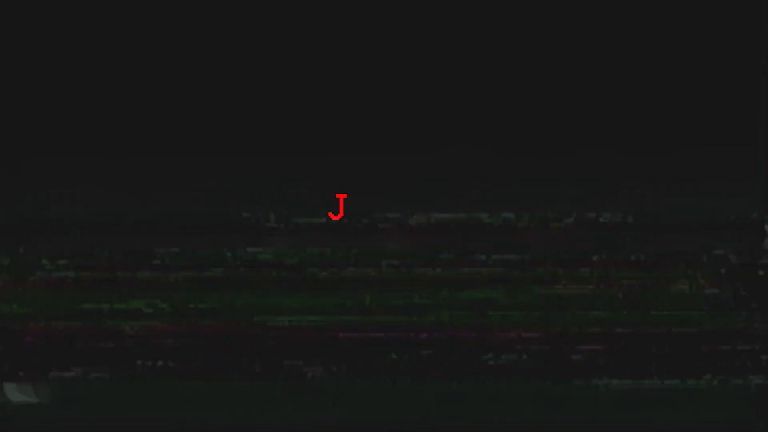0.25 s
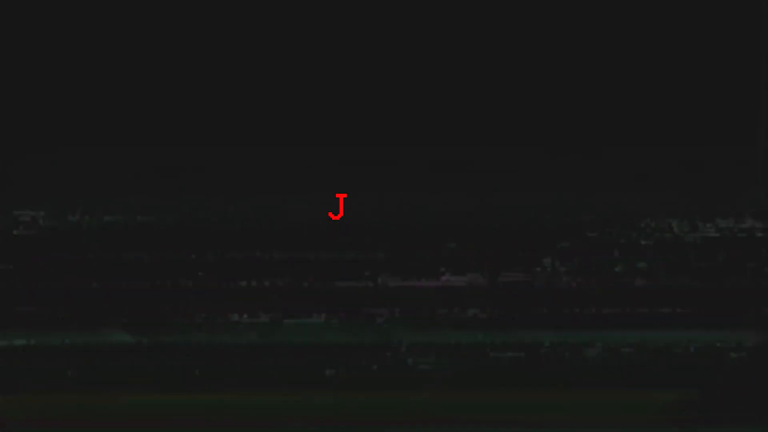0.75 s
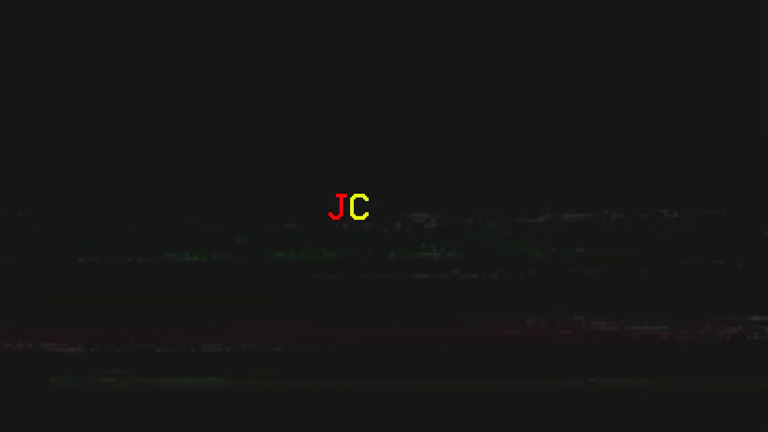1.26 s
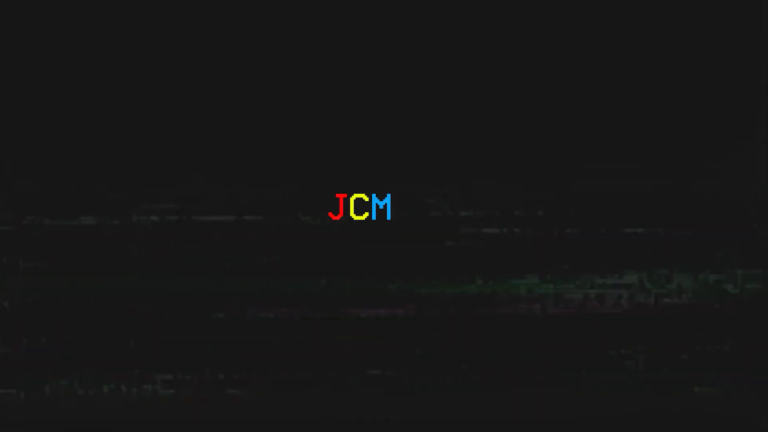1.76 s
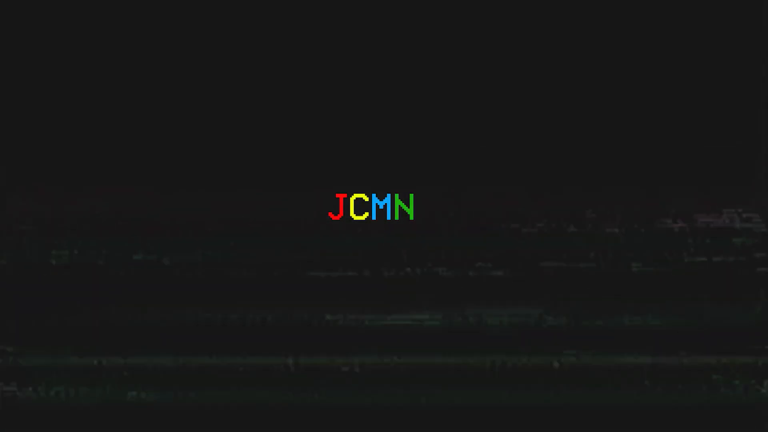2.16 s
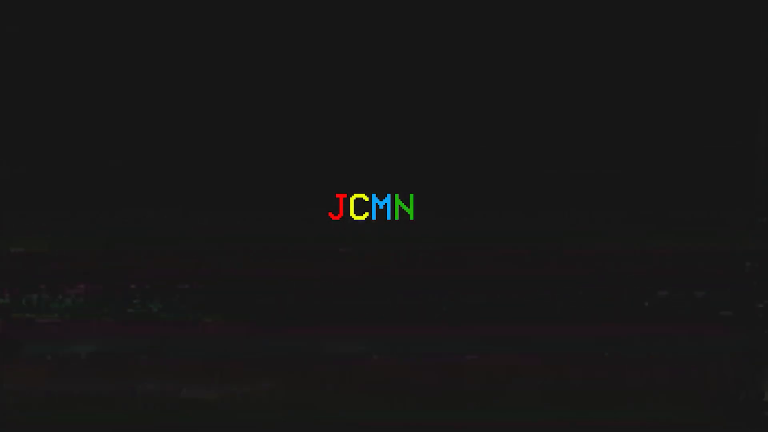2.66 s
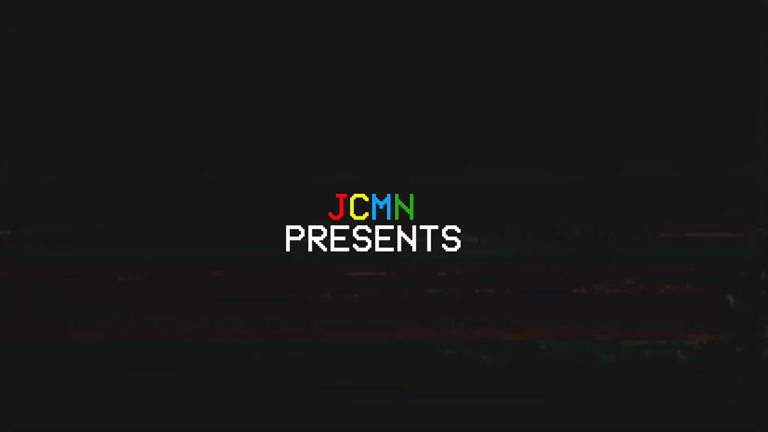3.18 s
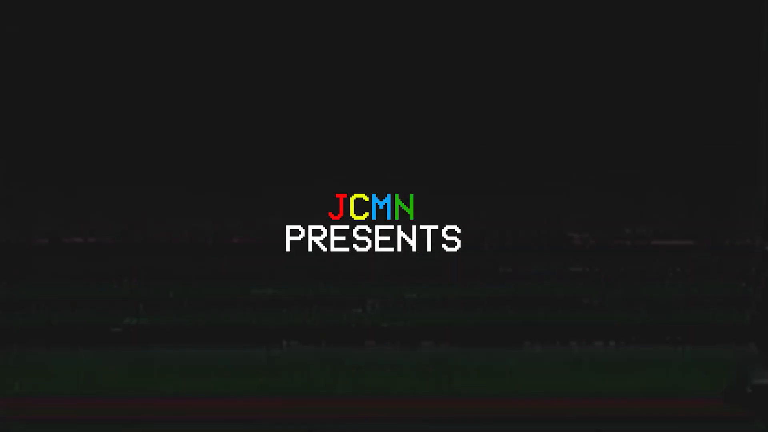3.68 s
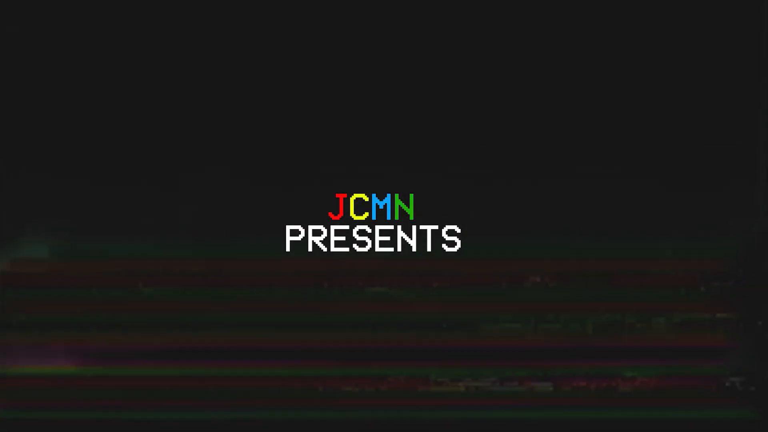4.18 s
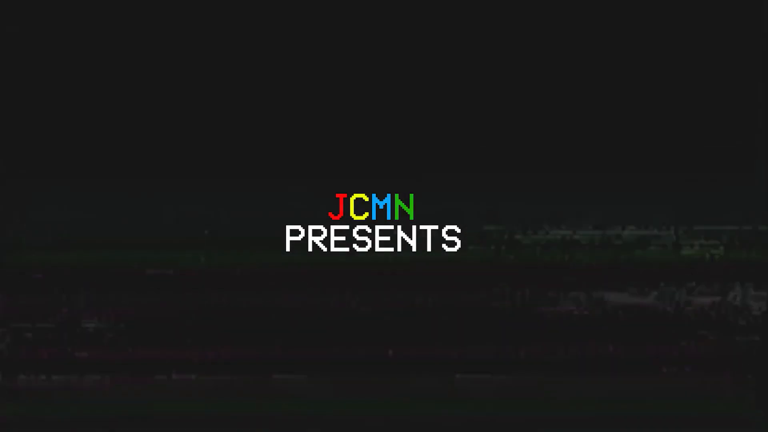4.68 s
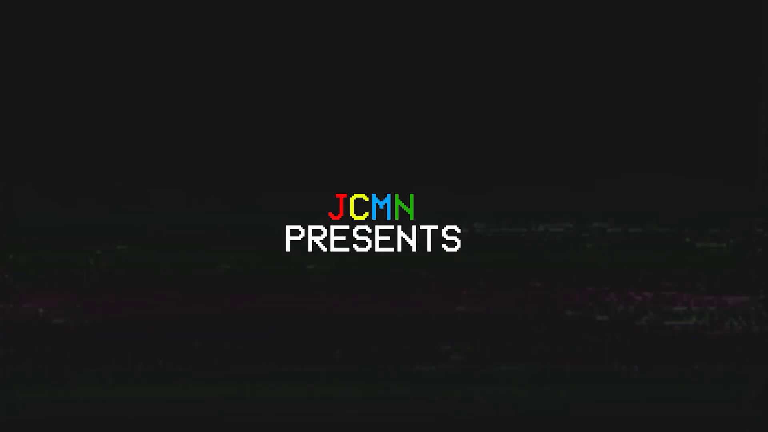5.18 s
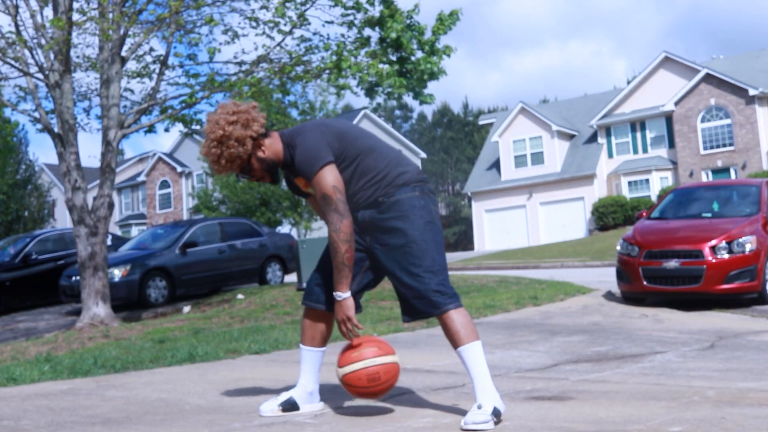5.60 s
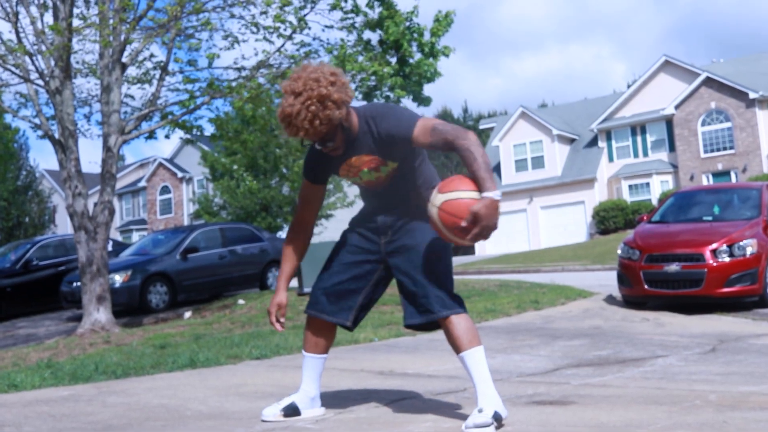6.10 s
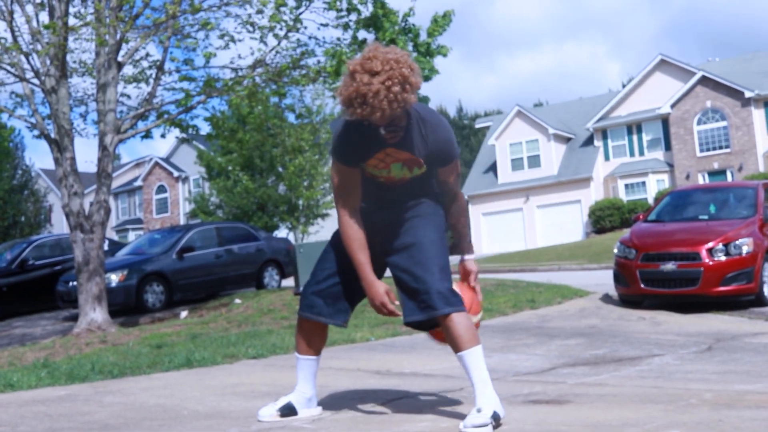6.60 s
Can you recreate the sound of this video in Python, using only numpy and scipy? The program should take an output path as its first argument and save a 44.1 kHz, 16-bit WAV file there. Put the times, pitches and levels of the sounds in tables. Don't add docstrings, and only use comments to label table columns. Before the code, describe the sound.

Dribbling on a suburban driveway: nine irregular bounces, some hard and bright, some softer and duller, answered by a near wall and short, dull echoes from house fronts. Fingertip ticks, palm pats and pebbled-cover brushing fall between them. Underneath lie steady distant traffic, leaf hiss and light wind rumble, with faint insect buzzes and small metal chimes. The microphone is a few metres away.

```python
import sys
import numpy as np
from scipy import signal
from scipy.fft import rfft, irfft
from scipy.io import wavfile
from scipy.ndimage import uniform_filter1d

SR = 44100
rng = np.random.default_rng(int(sys.argv[2]) if len(sys.argv) > 2 else 0)


def gain_from_decibels(decibels):
    exponent = np.asarray(decibels, float) / 20
    return 10 ** exponent


def wav_record(signal):
    frames = np.transpose(np.atleast_2d(signal))
    bounded = np.clip(frames, -1, 1)
    quanta = np.round(bounded * 32767).astype(np.int16)
    wavfile.write(sys.argv[1], SR, quanta)


N = 302085
TIME = np.arange(N) / SR

# pitch_hz, level_db (per Hz)
SUBURB_COLOUR = [(35, -31), (60, -5), (156, -1), (183, -4), (300, -10), (570, -16.5), (900, -14),
                 (1800, -19.5), (4000, -25), (10000, -30.5), (13500, -30.5), (15750, -26.5), (15950, -77)]
# middle_s, level_db, lasts_s
PASSING_CARS = [
    (0.297, 3, .12),
    (4.5, 3.5, 0.16),
]
# pitch_hz, level_db
WIND_COLOUR = [(12, -8), (25, 0), (40, -1.5), (70, -6), (140, -28), (500, -66)]
# pitch_hz, level_db
RUMBLE_COLOUR = [(30, -14), (70, 1), (140, 0.5), (250, -8.5), (500, -31), (2000, -68)]
# time_s, level_db
GUSTS = [(0.07, -66), (0.12, -65), (0.26, -66), (0.48, -62), (0.75, -66), (1.26, -64.5), (1.54, -60),
         (1.94, -63), (2.51, -58.5), (2.68, -53.5), (3.43, -55.5), (3.58, -54.5), (4.34, -58.5),
         (4.96, -58.5), (5.09, -48.5), (5.64, -60.5), (5.88, -63), (6.85, -63)]
# middle_s, level_db, lasts_s
FOOT_SHIFTS = [(1.853, 6, 0.11), (2.552, -1.5, 0.13), (3.935, 5.5, 0.052), (4.36, 5.5, .06),
               (5.218, 5.5, 0.065), (5.9, 5.5, .12), (6.3, 2, 0.3)]
# middle_s, level_db, lasts_s
INSECT_BUZZES = [
    (2.73, -73, .07),
    (6.8, -69, .13),
]
# middle_s, level_db, lasts_s, top_db (against the 8 kHz hiss)
BRUSHES = [(.325, -69, 0.014, 1), (0.588, -64.5, 0.023, 2), (0.644, -76, .02, 4), (1.756, -60, 0.016, 1),
           (3.014, -63.5, 0.028, 1), (3.833, -67, 0.0099, 3), (4.357, -64, 0.054, 2),
           (4.795, -66, 0.04, -2), (5.816, -63, 0.07, 0), (6.082, -65, 0.021, -8)]
# start_s, treble_db, body_db
FINGER_TICKS = [(0.496, -56, -49), (1.732, -51, -55), (1.739, -45.5, -47), (1.748, -59, -48),
                (1.7634, -62, -49.5), (2.822, -51, -56), (2.794, -71, -65), (2.858, -60, -62),
                (2.97, -54, -60), (2.974, -47, -49.5), (2.98, -52, -48), (2.987, -58, -53),
                (3.827, -52, -52.5), (3.831, -59, -57), (4.274, -60, -58), (4.88, -60, -66),
                (5.666, -56, -41), (6.07, -64, -63)]
# start_s, level_db, pitch_hz, build_ms
PALM_PATS = [(1.735, -39, 190, 5.3), (1.738, -41.5, 430, 4.7), (1.747, -47, 263, 4.3),
             (1.763, -44, 270, 2.6), (2.973, -40, 212, 5.5), (2.976, -40, 404, 4.6),
             (3.8262, -41, 394, 2.5), (3.827, -55, 260, 6), (5.664, -43, 380, 3.8)]
# start_s, thump_db, thump_hz, thump_late_ms, hardness_db
BOUNCES = [
    (0.4159, -19.5, 252, -0.53, 2),
    (1.5871, -14, 242, -1.82, 2),
    (2.7977, -14.5, 243, -0.58, 1.5),
    (3.6806, -10.5, 239, 0.83, -0.8),
    (4.0823, -14, 228, -0.39, -2),
    (4.6414, -22.5, 240, -1, -4.5),
    (4.969, -10.5, 226, 1.5, -3.5),
    (5.6787, -9.5, 235, -0.41, 0.4),
    (6.8093, -19.5, 201, -0.44, 1.5),
]
# lower_hz, lower_db, upper_hz, upper_db, first_spike_db
AIR_MODES = [(478, -19.5, 1240, -17, -14.5), (1200, -20.5, 1406, -19, -9.5), (865, -16.5, 1107, -17, -42),
             (918, -17, 1096, -18.5, -38), (820, -26.5, 1330, -27, -14.5), (1130, -45, 1300, -44, -21),
             (720, -14.5, 1150, -20.5, -54), (605, -29, 1180, -16, -42), (1150, -18, 1690, -14.5, -35)]
# pitch_hz, level_db
CRACK_COLOUR = [(1500, 5.5), (2600, 0), (3300, -10), (5500, -5.5), (7000, -9.5), (8400, -5.5),
                (11000, -13.5), (14000, -10), (17000, -55)]
# pitch_hz, level_db, t60_s
BALL_RING = [(410, -1.5, 0.073), (435.7, 4, 0.058), (546, -7, 0.06), (954, -14, 0.071), (1060, -5.5, 0.045),
             (1240, -13, 0.039), (1817, -6, 0.033)]
# delay_s, level_db
HOUSE_FRONTS = [(0.024, -25), (0.043, -35), (.051, -27), (.071, -32.5), (.096, -38)]
# pitch_hz, level_db
STREET_COLOUR = [(100, -4), (400, 1.5), (1300, -5.5), (2600, -1.5), (4500, -1), (10000, -3.5)]
# start_s, pitch_hz, level_db, t60_s
FAR_ROD = [(3.719, 2805, -67, 0.76)]
# pitch_hz, level_db, t60_s
ROD_MODES = [(1905, 0.5, 1), (5044, 0.5, 0.26), (7100, -13, .06), (9250, -3, .06)]
# start_s, level_db, brightness_db, full_s (then the ring sinks to about half)
CHIME_HITS = [
    (5.092, -62, 5, 0.099),
    (5.198, -63, -0.5, 0.11),
    (5.31, -62.5, -6, 0.14),
]


def level(x, db):
    return x * gain_from_decibels(db) / np.sqrt(np.mean(x ** 2))


def band(x, hz, width):
    return signal.lfilter(*signal.iirpeak(hz, hz / width, fs=SR), x)


def colour(x, points):
    hz, db = np.transpose(points)
    f = np.log(np.fft.rfftfreq(len(x), 1 / SR) + 1)
    return irfft(rfft(x) * gain_from_decibels(np.interp(f, np.log(hz), db)), len(x))


def walk(rate):
    k = int(SR / rate)
    held = np.repeat(rng.standard_normal(N // k + 1), k)
    return 0.98 * uniform_filter1d(uniform_filter1d(held, k), k)[:N]


def hump(s, lasts):
    return np.exp(-((TIME - s) / lasts) ** 2)


def humps(events):
    return sum(db * hump(s, lasts) for s, db, lasts in events)


def add(out, s, sound):
    i = int(s * SR)
    out[i:i + len(sound)] += sound[:len(out) - i]


def swell(t, ms):
    u = np.maximum(t, 0) / (ms / 1000)
    return u * np.exp(1 - u)


def ring(t, hz, t60):
    return np.sin(2 * np.pi * hz * t) * np.exp(-np.log(1000) * t / t60)


def suburb():
    hum = colour(rng.standard_normal(N), SUBURB_COLOUR)
    octaves = sum(band(hum, hz, hz) * gain_from_decibels(walk(3.28)) for hz in 62 * 2. ** np.arange(8))
    bed = level(octaves + 0.73 * hum, -58)
    leaves = signal.lfilter(*signal.butter(1, 1500, "high", fs=SR), bed)
    bed = bed + band(bed, 1500, 1300) * (gain_from_decibels(humps(PASSING_CARS)) - 1)
    leaves_db = 1.25 + 0.25 * (TIME - N / SR / 2) - 2.5 * hump(2.9, 0.91)
    return bed + leaves * (gain_from_decibels(leaves_db) - 1)


def air():
    wind_db = np.interp(TIME, *np.transpose(GUSTS))
    rumble_db = -58 + 0.48 * (wind_db + 57.5) + humps(FOOT_SHIFTS)
    wind = level(colour(rng.standard_normal(N), WIND_COLOUR), 0.47) * gain_from_decibels(wind_db + 3.2 * walk(17))
    rumble = level(colour(rng.standard_normal(N), RUMBLE_COLOUR), -2.3)
    rumble = rumble * gain_from_decibels(rumble_db + 1.5 * walk(14) + 0.5 * walk(2.94))
    insect = level(band(band(rng.standard_normal(N), 5900, 950), 5900, 950), 0)
    return wind + rumble + insect * sum(gain_from_decibels(db) * hump(s, lasts) for s, db, lasts in INSECT_BUZZES)


def brushes():
    hiss = level(band(band(rng.standard_normal(N), 6800, 3000), 8500, 2200), -4) * gain_from_decibels(1.4 * walk(200))
    top_colour = [(6000, -9), (10500, -7), (13200, 3.0), (15700, -7), (16000, -40)]
    top = level(colour(rng.standard_normal(N), top_colour), -2)
    return sum(gain_from_decibels(db) * hump(s, lasts) * (hiss + gain_from_decibels(top_db) * top) for s, db, lasts, top_db in BRUSHES)


def palms():
    out, t = brushes(), TIME[:SR // 10]
    tick_colour = [(3500, -26), (6000, -3), (8400, 3.5), (11000, -7), (13500, 0), (15800, -11), (16400, -30)]
    for s, treble_db, body_db in FINGER_TICKS:
        treble = colour(rng.standard_normal(len(t)), tick_colour)
        body = band(band(rng.standard_normal(len(t)), 650, 1700), 876, 2200)
        add(out, s, level(treble, treble_db) * swell(t, 0.67) + level(body, body_db) * swell(t, 1.0))
    for s, db, hz, ms in PALM_PATS:
        add(out, s, gain_from_decibels(db) * swell(t, ms) * np.exp(-(t / 0.013) ** 2) * np.sin(2 * np.pi * hz * t))
    return out


def grit(t, db):
    return level(colour(rng.standard_normal(len(t)), CRACK_COLOUR), db)


def slap(t, late_ms, modes):
    slap_ms, knee_hz = 3.22, 1470
    sound = sum(gain_from_decibels(db) * np.sin(2 * np.pi * hz * t)
                * np.exp(-(t * 1000 / slap_ms * max(hz / knee_hz, 1)) ** 2) for hz, db in modes)
    return sound * np.minimum(t * 1000 / (0.032 + 0.92 * max(late_ms, 0)), 1)


def contact(t, thump_db, thump_hz, late_ms, hard_db, modes, spike_db):
    late = t - late_ms / 1000
    thump = gain_from_decibels(thump_db) * swell(late, 2.85) * np.sin(2 * np.pi * thump_hz * late)
    squash = gain_from_decibels(-23.5 + 1.3 * hard_db) * swell(late, 2.64) * np.sin(2 * np.pi * 122 * late)
    onset = np.sin(np.pi / 2 * np.minimum(t / 0.00027, 1)) ** 2
    sound = (thump - squash + slap(t, late_ms, modes)) * onset
    spike = signal.lfilter(*signal.butter(2, 2780, fs=SR), swell(t, 0.12))
    sound = sound + gain_from_decibels(spike_db) * spike
    crack = grit(t, -27 + hard_db) * (np.exp(-t / 0.0011) + 0.57 * np.exp(-(t / 0.0041) ** 2))
    return sound - band(sound, 3490, 1960) + crack


def lift(t, flat_ms, click_db, peel_db):
    since = t - flat_ms / 1000
    peel = grit(t, peel_db) * np.exp(-(since / np.where(since < 0, .0028, .0012)) ** 2)
    click = gain_from_decibels(click_db) * swell(since + 0.00039, 0.27) ** 2 * np.cos(2 * np.pi * 450 * since)
    return peel - click


def free_ring(t, flat_ms, db):
    drift = rng.standard_normal((len(BALL_RING), 2))
    free = sum(gain_from_decibels(mode_db + 2.55 * d[0]) * ring(t, hz * (1 + 0.028 * d[1]), t60)
               for (hz, mode_db, t60), d in zip(BALL_RING, drift))
    return gain_from_decibels(db) * free * np.clip(t * 1000 / flat_ms, 0, 1) ** 2


def ball():
    out, t = np.zeros(N), TIME[:SR // 4]
    for bounce, air_modes in zip(BOUNCES, AIR_MODES):
        s, thump_db, thump_hz, late_ms, hard_db = bounce
        low_hz, low_db, high_hz, high_db, spike_db = air_modes
        third_db = max(low_db, high_db) - 13.5 + 5.5 * abs(late_ms) + 0.17 * (spike_db + 20)
        modes = [(low_hz, low_db), (high_hz, high_db), (1940, third_db), (2700, third_db - 3)]
        sound = contact(t, thump_db, thump_hz, late_ms, hard_db, modes, spike_db)

        wall_db = -28.5 + 0.81 * (spike_db + 25) - 0.9 * (thump_db + 16)
        wall = gain_from_decibels(wall_db) * signal.lfilter(*signal.butter(1, 600, fs=SR), sound)
        add(out, s + 0.0086, wall)

        flat_ms = 10.8 + 0.35 * late_ms
        free = free_ring(t, flat_ms, -24 + 0.5 * (thump_db + 14) + 0.44 * hard_db)
        click_db = -18.5 + 0.6 * hard_db - 0.14 * (thump_db + 17.5)
        peel_db = -37.5 + 0.5 * hard_db
        add(out, s, sound + lift(t, flat_ms, click_db, peel_db) + free)
    return out


def street(x):
    t, t60_s = TIME[:SR // 2], 0.37
    tail = rng.standard_normal(len(t)) * np.exp(-np.log(1000) * t / t60_s)
    tail = tail * np.clip((t - .018) / 0.018, 0, 1)
    tail = tail * gain_from_decibels(-21) / np.sqrt(np.sum(tail ** 2))
    for s, db in HOUSE_FRONTS:
        add(tail, s, gain_from_decibels([db]))
    dull = colour(tail, STREET_COLOUR) * (t > .012)
    return x + signal.fftconvolve(x, dull)[:N]


def chime():
    out, t = np.zeros(N), TIME[:SR]
    for s, hz, db, t60 in FAR_ROD:
        add(out, s, gain_from_decibels(db) * ring(t, hz, t60))
    for s, db, bright_db, lasts in CHIME_HITS:
        rod = sum(gain_from_decibels(m_db + bright_db * (hz > 3000)) * ring(t, hz, t60) for hz, m_db, t60 in ROD_MODES)
        add(out, s, gain_from_decibels(db) * rod * np.minimum(t / .006, 1) * np.clip((lasts - t) / 0.035, .55, 1))
    return out


def scene():
    bed = suburb() + air()
    return (bed + street(palms() + ball()) + chime())[None]


def low_pass(x):
    return signal.sosfilt(signal.butter(12, 16830, fs=SR, output="sos"), x)


def record(dry):
    top = signal.ellip(8, .2, 70, 16300, fs=SR, output="sos")
    start_s, fade_s = 0.0622, 0.0036
    mix = signal.sosfilt(top, dry) * np.clip((TIME - start_s) / fade_s, 0, 1)
    return low_pass(mix)


dry = scene()
out = record(dry)
wav_record(out)
```